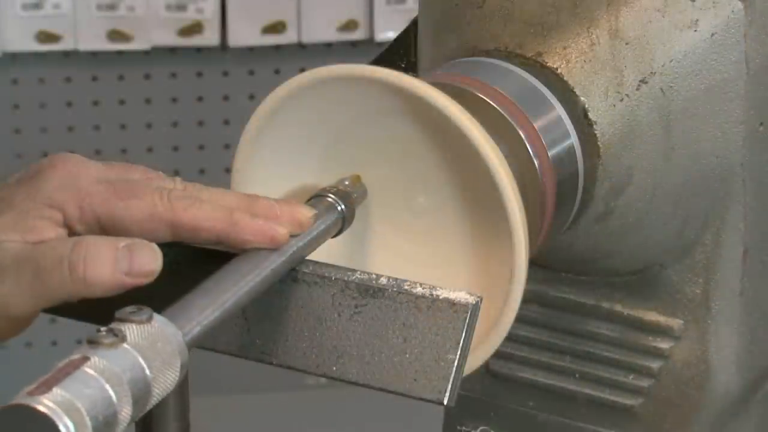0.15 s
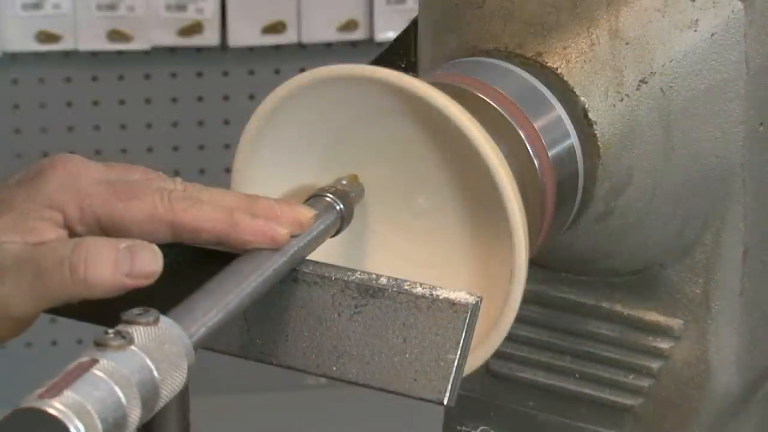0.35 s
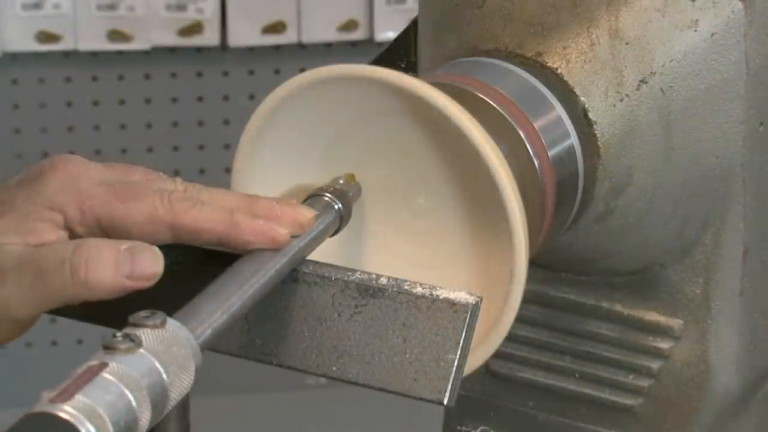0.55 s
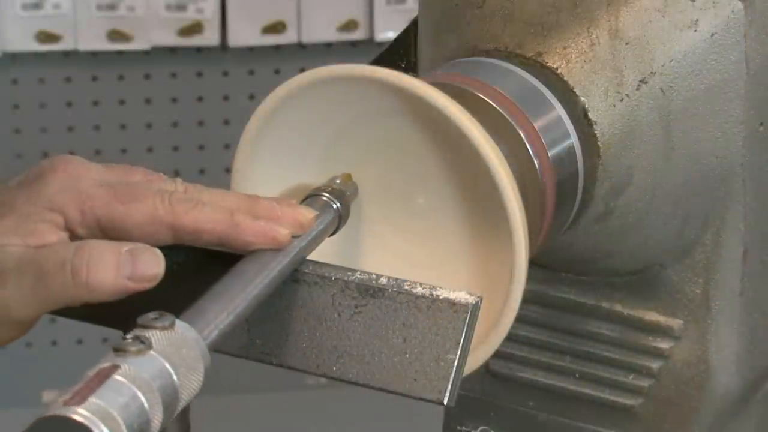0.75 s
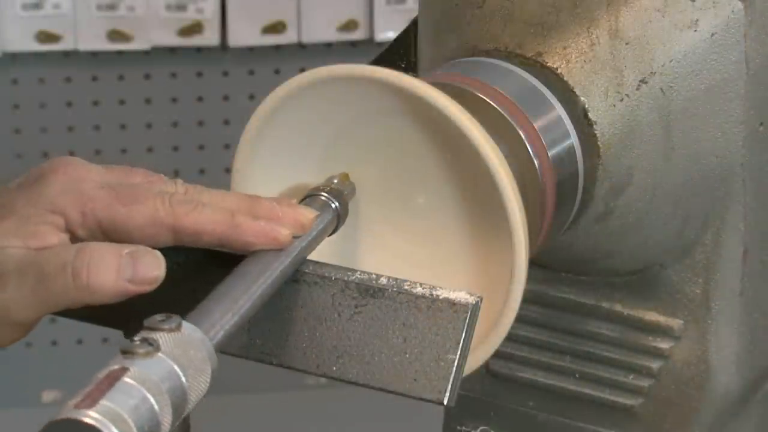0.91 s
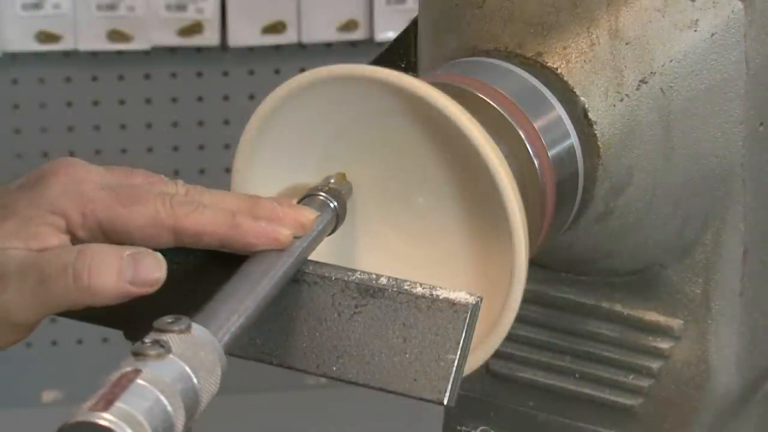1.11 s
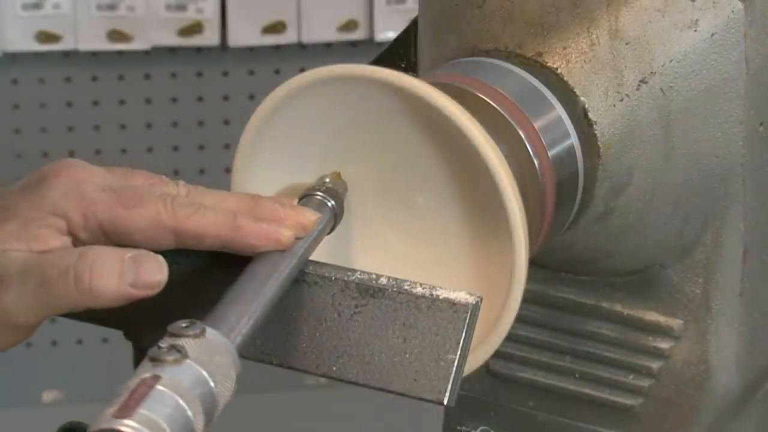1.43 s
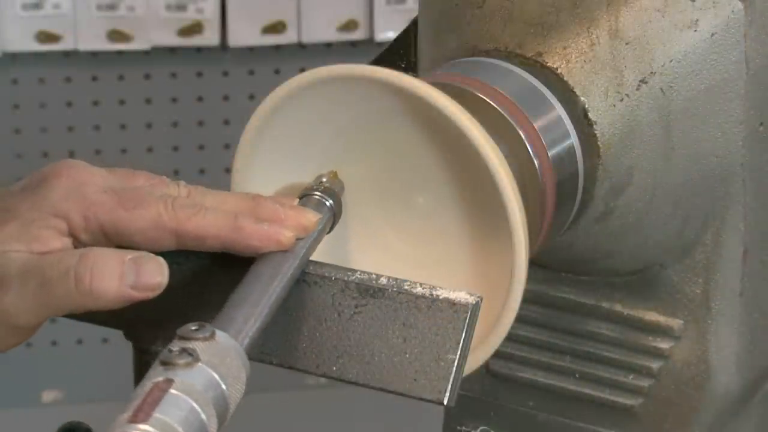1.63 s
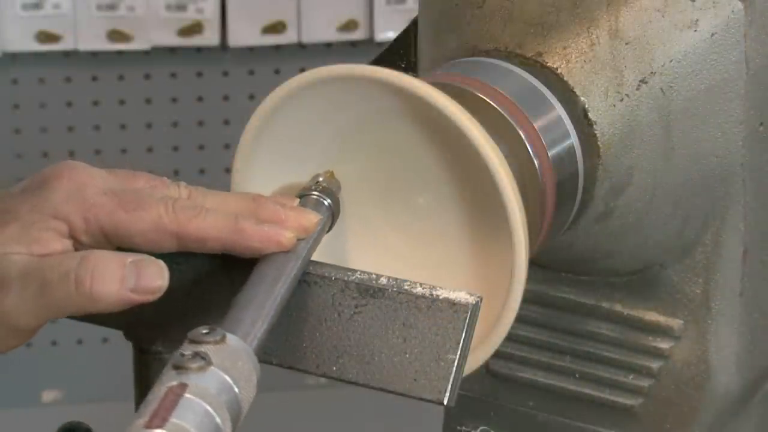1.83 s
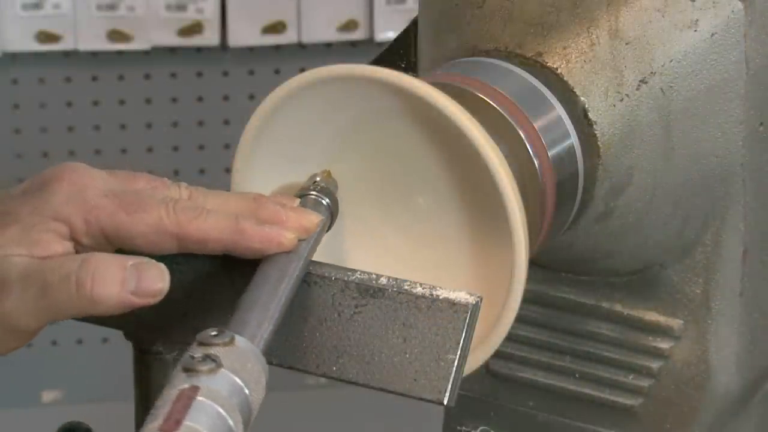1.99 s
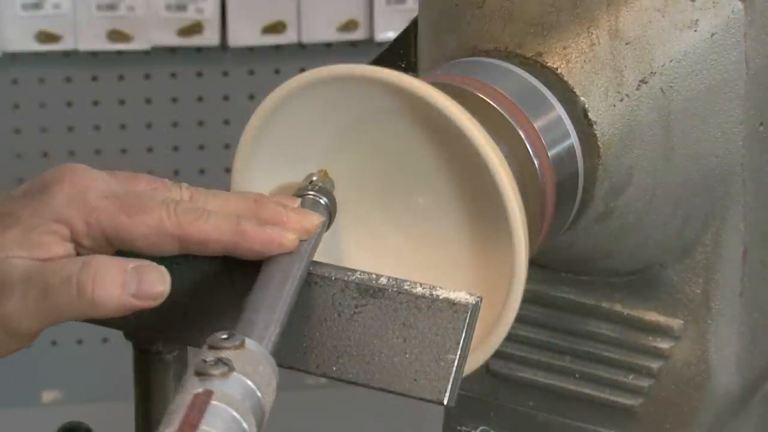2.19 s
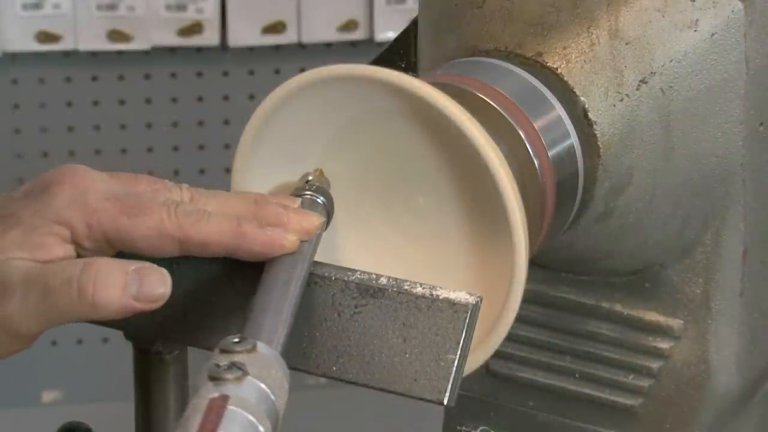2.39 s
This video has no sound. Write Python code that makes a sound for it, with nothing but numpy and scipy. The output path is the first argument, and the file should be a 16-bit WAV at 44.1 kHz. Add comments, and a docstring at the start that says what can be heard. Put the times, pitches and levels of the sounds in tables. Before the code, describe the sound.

A steel cutter scrapes the inside of a spinning wooden bowl, heard close up. The steady hiss flutters rapidly throughout, with brief high squeals and a ringing chatter that comes and goes over a very faint lathe hum.

```python
"""Finishing cut on a wood lathe

A steel cutter scrapes the inside of a spinning wooden bowl, heard close up. Each turn drags nearly
the same grain under the edge, so the hiss repeats at the spindle rate and slowly renews; its colour
shifts as the cutter swings round. The bowl wall sings on the two end-grain passes of a turn and on
the side grain between, hard spots squeal, and the lathe hums faintly beneath."""
import sys
import numpy as np
from scipy import signal
from scipy.fft import rfft, irfft, next_fast_len
from scipy.io import wavfile
from scipy.ndimage import uniform_filter1d

SR = 44100
rng = np.random.default_rng(int(sys.argv[2]) if len(sys.argv) > 2 else 0)


def unload_audio(sound):
    """Save the sound as a 16-bit wav file, at the path given as the first command line argument."""
    columns = np.transpose(np.atleast_2d(sound))
    # keep every value between -1 and 1, then stretch to whole-number steps
    steps = np.round(np.clip(columns, -1, 1) * 32767)
    wavfile.write(sys.argv[1], SR, steps.astype(np.int16))


N = 112454
TIME_S = np.arange(N) / SR
FFT_SIZE = next_fast_len(N + SR // 2)
SPIN_HZ = 25.048
ANGLE_TURNS = SPIN_HZ * TIME_S


def amp(db):
    """Decibels to gain."""
    return 10 ** (np.asarray(db) / 20)


def unit(x):
    """Scale to rms 1."""
    return x / np.sqrt(np.mean(x ** 2) + 1e-20)


def over_freq(rows, hz):
    """Interpolate (f/Hz, value) rows on a log axis."""
    row_hz, values = np.transpose(rows)
    return np.interp(np.log(hz + 1), np.log(row_hz + 1), values)


def over_time(rows):
    """Interpolate (t/s, value) rows at every sample."""
    return np.interp(TIME_S, *np.transpose(rows))


def filtered(x, gain):
    """Apply gain(hz) by FFT."""
    hz = np.fft.rfftfreq(FFT_SIZE, 1 / SR)
    return irfft(rfft(x, FFT_SIZE) * gain(hz), FFT_SIZE)[..., :N]


def noise(spectrum):
    """Coloured noise, rms 1."""
    return unit(filtered(rng.standard_normal(N), lambda hz: amp(over_freq(spectrum, hz))))


def resonate(x, modes, floor=None):
    """Pass x through steep (f/Hz, width/Hz, level/dB) modes plus an optional broad spectrum; rms 1."""
    def gain(hz):
        power = sum(amp(db) ** 2 / (1 + 2 * ((hz - mode_hz) / width_hz) ** 2) ** 2
                    for mode_hz, width_hz, db in modes)
        if floor is not None:
            power += amp(over_freq(floor, hz)) ** 2
        return np.sqrt(power)
    return unit(filtered(x, gain))


def passing(place_turns, span_turns):
    """A hump each time one spot of the bowl passes the edge."""
    offset_turns = (ANGLE_TURNS - place_turns + .5) % 1 - .5
    return np.exp(-(offset_turns / span_turns) ** 2)


# Roughness new on every turn: f/Hz, share/0-1
FRESH_SHARE = [(500, .2), (1000, .03), (1500, .06), (3500, .03), (6500, .1), (10000, .23), (14000, 1)]


def surface(memory_turns=3.4):
    """Roughness under the edge: each turn overlaps its neighbours' tracks, and part is torn afresh."""
    lags_turns = np.arange(-7, 8)
    overlap = np.exp(-(lags_turns / memory_turns) ** 2)
    overlap /= np.linalg.norm(overlap)

    def gain(hz):
        comb = sum(weight * np.cos(2 * np.pi * hz * lag / SPIN_HZ)
                   for lag, weight in zip(lags_turns, overlap))
        fresh = over_freq(FRESH_SHARE, hz)
        return np.sqrt((1 - fresh) * comb ** 2 + fresh)
    return unit(filtered(rng.standard_normal(FFT_SIZE), gain))


def add_reflections(x, t60_s=.06, wet_db=-12):
    """Quick reflections inside the bowl and off the lathe ripple the spectrum."""
    t = TIME_S[:SR // 10]
    tail = rng.standard_normal(len(t)) * amp(-60 * t / t60_s)
    tail /= np.linalg.norm(tail)
    return unit(x + amp(wet_db) * signal.fftconvolve(x, tail)[:N])


# Cut pressure as hiss: t/s, level/dB re gain_db
CUT_LEVEL = [(0, -41), (.11, -41), (.25, -39), (.55, -39), (.8, -39), (.95, -38.5), (1.18, -38),
             (1.3, -38.5), (1.55, -39.5), (1.65, -39), (1.74, -40), (1.93, -39), (2.1, -40), (2.27, -40),
             (2.36, -42), (2.46, -40.5), (2.55, -42)]
# Cutter swing: t/s, share/0-1
CUTTER_SWING = [(0, 0.07), (1.3, 0.19), (1.8, 0.44), (1.98, 0.93), (2.55, 1)]
# Cutter and bowl modes: f/Hz, width/Hz, relative level/dB before the swing, same after it
CUTTER_MODES = [(2611, 163, 1, -10), (3174, 466, 2, -8.5), (3320, 150, 4, 0), (3880, 140, -3, -1),
                (4080, 260, 2, -11), (4313, 670, 0, 1.5), (5204, 290, 0.5, 0.5), (5690, 550, -1, -50),
                (6330, 700, -11.5, -2), (6520, 310, 2.5, -5), (6886, 130, 3.5, -32), (7560, 300, -1.5, -5),
                (7960, 660, -6, -21), (8430, 1470, -6, -9.5)]
# Broad hiss of parting shavings: f/Hz, relative density/dB
SHAVINGS_SPECTRUM = [(1500, -92), (2400, -30), (3200, -24), (6000, -14.5), (9500, -9.5), (11300, -12),
                     (12700, -19.5), (14000, -18.5), (15000, -57)]


def hiss(gain_db=.18):
    """The wood scrapes through the cutter's resonances, whose balance follows the swing."""
    wood = add_reflections(surface(memory_turns=1.8))
    hz, width_hz, before_db, after_db = np.transpose(CUTTER_MODES)
    before = resonate(wood, zip(hz, width_hz, before_db), floor=SHAVINGS_SPECTRUM)
    after = resonate(wood, zip(hz, width_hz, after_db), floor=SHAVINGS_SPECTRUM)
    swing = over_time(CUTTER_SWING)
    blend = unit((1 - swing) * before + swing * after)
    return amp(over_time(CUT_LEVEL) + gain_db) * blend


# Bowl modes, low and middle: f/Hz, width/Hz, relative level/dB
BOWL_LOW_MODES = [(518, 99, -8.5), (637, 64, -7.5), (890, 75, -5.5), (1000, 110, -8.5), (1216, 133, 6)]
BOWL_MID_MODES = [(1420, 107, -3.5), (1510, 92, -8), (1856, 255, -4.5), (2016, 41, 4), (2190, 86, -6)]
# Scrape in each band: t/s, level/dB re low_db or mid_db
LOW_LEVEL = [(0, -56), (.12, -54.5), (.27, -51), (.42, -55.5), (.55, -53), (.85, -54.5), (1.1, -57),
             (1.35, -53), (1.9, -59), (2.1, -55), (2.25, -53.5), (2.55, -57.5)]
MID_LEVEL = [(0, -58), (.24, -56.5), (.34, -60.5), (.75, -60), (.98, -55.5), (1.12, -61), (1.33, -55.5),
             (1.5, -58.5), (1.71, -54.5), (1.84, -63), (1.95, -60), (2.11, -63.5), (2.35, -65),
             (2.55, -63.5)]


def scrape(low_db=-1, mid_db=-.5):
    """The rubbing edge drives the bowl's low and middle resonances."""
    low = amp(over_time(LOW_LEVEL) + low_db) * resonate(surface(), BOWL_LOW_MODES)
    mid = amp(over_time(MID_LEVEL) + mid_db) * resonate(surface(), BOWL_MID_MODES)
    return low + mid


# Singing on the long end-grain, short end-grain and side-grain passes: t/s, peak level/dB
LONG_PASS_LEVEL = [(0, -60), (.25, -60), (.32, -50), (.44, -47), (.55, -49.5), (.66, -52), (.81, -59),
                   (.835, -44), (.88, -42), (.96, -43), (1.04, -53), (1.16, -49), (1.3, -52), (1.48, -48),
                   (1.6, -53), (1.79, -51), (1.85, -41.5), (2, -42), (2.09, -50), (2.2, -47), (2.28, -43),
                   (2.32, -47), (2.37, -61), (2.55, -58)]
SHORT_PASS_LEVEL = [(0, -62), (.42, -58), (.5, -46), (.58, -47), (.65, -56), (.79, -56), (.82, -40.5),
                    (.87, -41), (.91, -44), (.96, -54), (1.2, -51), (1.35, -55), (1.45, -52), (1.6, -48),
                    (1.78, -47), (1.82, -41), (2.02, -39.5), (2.08, -42), (2.22, -41.5), (2.3, -46),
                    (2.35, -62), (2.45, -54), (2.55, -52)]
SIDE_PASS_LEVEL = [(0, -53), (.1, -48), (.2, -55), (.4, -53), (.56, -58), (.65, -48), (.72, -49), (.8, -60),
                   (.84, -48.5), (1, -52), (1.1, -49), (1.35, -49.5), (1.46, -47.5), (1.55, -50),
                   (1.62, -62), (1.77, -55), (1.85, -50), (2, -49.5), (2.08, -62), (2.2, -56), (2.3, -52),
                   (2.38, -61), (2.55, -49)]
# Those passes, same order: place/turns, span/turns
GRAIN_PASSES = [(.04, .18), (.705, .09), (.48, .21)]


def wall_singing(cycles_per_turn=48, rough_width_hz=70, rough_gain=.15, hold_gain=.13):
    """The wall chatters in step with its own marks: a stroke on each pass, a weak ring held between."""
    tone = np.sqrt(2) * np.sin(2 * np.pi * cycles_per_turn * ANGLE_TURNS)
    rough = resonate(surface(), [(cycles_per_turn * SPIN_HZ, rough_width_hz, 0)])
    levels = (LONG_PASS_LEVEL, SHORT_PASS_LEVEL, SIDE_PASS_LEVEL)
    power = sum(amp(over_time(level)) ** 2 * (passing(*spot) ** 2 + hold_gain ** 2)
                for level, spot in zip(levels, GRAIN_PASSES))
    return np.sqrt(power) * unit(tone + rough_gain * rough)


# Catches of the edge: peak t/s, length/s, f/Hz, width/Hz, peak level/dB re gain_db,
# place/turns, span/turns (1 = all round)
HARD_SPOTS = [(.37, .22, 1010, 120, -47, .88, .08), (.33, .25, 990, 120, -50, .55, .1),
              (1.306, .12, 424, 129, -69.5, .5, 1), (.21, .18, 2005, 60, -57, .5, 1),
              (.21, .14, 2590, 130, -47, .68, .06), (.22, .12, 2590, 130, -49, .08, .06),
              (.69, .17, 2580, 130, -46, .6, .06), (1.22, .19, 2620, 200, -47, .65, .1),
              (1.28, .12, 2600, 200, -46, .98, .09), (1.67, .16, 2650, 140, -46, .62, .07),
              (1.63, .13, 2650, 140, -46, .05, .06), (.06, .17, 3270, 150, -39, .56, .07),
              (.02, .1, 3270, 150, -44, .73, .08), (.32, .19, 3250, 190, -40, .27, .06),
              (.33, .14, 3330, 190, -40, .86, .07), (.48, .16, 3290, 190, -42, .81, .06),
              (.46, .12, 3250, 190, -42, .14, .09), (.58, .14, 3190, 190, -42.5, .35, .06),
              (.6, .14, 3200, 150, -45, .95, .05), (.88, .17, 3350, 200, -45, .8, .2),
              (1.08, .2, 3350, 150, -44, .61, .07), (1.31, .14, 3300, 150, -43, .07, .06),
              (2.05, .18, 3450, 150, -44, .05, .12), (.22, .25, 4110, 220, -39.5, .4, .05),
              (.26, .15, 4110, 220, -39.5, .61, .05), (.2, .14, 4110, 220, -41, .94, .06),
              (.25, .15, 4110, 220, -42, .13, .07), (.6, .16, 4250, 220, -44, .43, .05),
              (.68, .15, 4385, 110, -47, .3, 1), (1.15, .12, 4350, 170, -38.5, .74, .07),
              (1.55, .22, 4150, 220, -41, .89, .05), (1.92, .1, 4150, 265, -48, .3, .5),
              (2.1, .16, 4070, 300, -41, .42, .07), (2.07, .14, 4030, 380, -42, .7, 1),
              (.11, .1, 4110, 220, -43, .4, .06), (2.26, .11, 3930, 140, -42, .05, .25),
              (.79, .12, 5200, 250, -41.5, .72, .16), (.8, .12, 5200, 300, -42.5, .14, .05),
              (1.13, .12, 5200, 300, -43, .36, .08), (1.347, .09, 5300, 190, -44, .15, .12),
              (2.03, .22, 5200, 200, -41, .88, .06), (2.2, .2, 5200, 170, -48, .3, .3),
              (.45, .27, 5770, 300, -49, .5, 1), (.61, .17, 6800, 250, -47.5, .4, 1),
              (.96, .13, 6500, 300, -40, .06, .05), (.96, .14, 6500, 300, -40.5, .32, .05),
              (1.01, .22, 6500, 400, -44, .65, .3), (2.12, .14, 6470, 300, -47, .5, 1),
              (2.464, .37, 6560, 260, -48, .8, 1)]


def squeals(gain_db=1, smooth_samples=110):
    """A hard spot sets one resonance chattering once a turn, until the cutter has moved past it."""
    wood = surface()
    out = np.zeros(N)
    for peak_s, length_s, hz, width_hz, db, place_turns, span_turns in HARD_SPOTS:
        ring = resonate(wood, [(hz, width_hz, 0)])
        ring /= np.sqrt(uniform_filter1d(ring ** 2, smooth_samples) + .05)  # evens the strength
        swell = np.exp(-2 * ((TIME_S - peak_s) / length_s) ** 2)
        out += amp(db + gain_db) * swell * passing(place_turns, span_turns) * ring
    return out


# Motor hum: f/Hz, level/dB
MOTOR_HUM = [(150.5, -91), (199.5, -91.5), (247.6, -84), (275, -91.5), (301, -91), (376.5, -88)]
# Spindle drone: f/SPIN_HZ, level/dB
SPINDLE_DRONE = [(32, -79), (35, -75), (36, -71), (38, -72), (40, -74), (41, -67.5), (43, -73)]
# Bearing and fan noise: f/Hz, relative density/dB
BEARING_SPECTRUM = [(20, -13), (60, -1), (92, 11.5), (130, -1), (250, 6), (330, -9), (450, 9), (1000, 22.5),
                    (4000, -1.5)]


def lathe(bearings_db=-63.5):
    """Motor hum and spindle drone over bearing and fan noise."""
    drone = [(order * SPIN_HZ, db) for order, db in SPINDLE_DRONE]
    tones = sum(amp(db) * np.sqrt(2) * np.sin(2 * np.pi * (hz * TIME_S + rng.random()))
                for hz, db in MOTOR_HUM + drone)
    return tones + amp(bearings_db) * noise(BEARING_SPECTRUM)


# Left-right noise: f/Hz, relative density/dB
STEREO_SPECTRUM = [(20, -11), (100, -7), (250, -12), (500, 4), (2000, -6), (4500, -16), (8000, -19),
                   (13000, 21.5)]


def stereo_noise(level_db=-70):
    """Faint steady noise that gives a trace of width."""
    return amp(level_db) * noise(STEREO_SPECTRUM)


def scene():
    """Cut and lathe in the centre, faint noise in antiphase between the channels."""
    bowl = scrape() + wall_singing()
    centre = hiss() + bowl + squeals() + lathe()
    side = stereo_noise()
    return np.array([centre + side, centre - side])


def record(dry, cutoff_hz=14750):
    """Brick-wall low-pass."""
    return filtered(dry, lambda hz: hz < cutoff_hz)


dry = scene()
out = record(dry)
unload_audio(out)
```